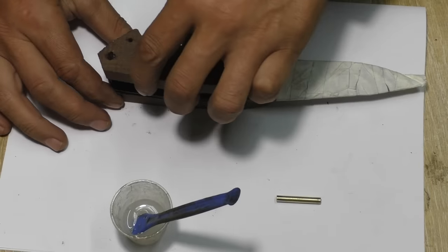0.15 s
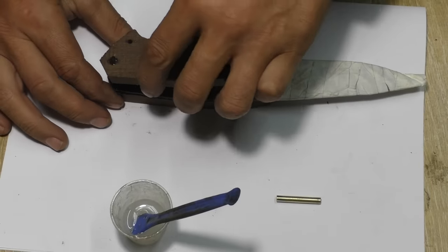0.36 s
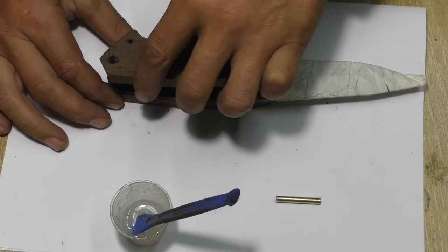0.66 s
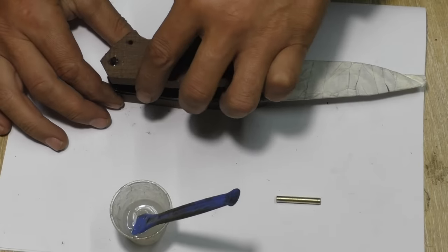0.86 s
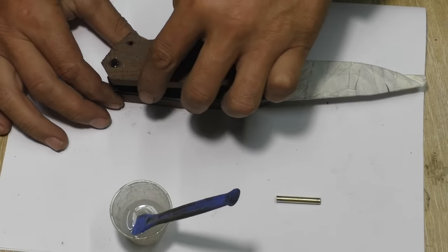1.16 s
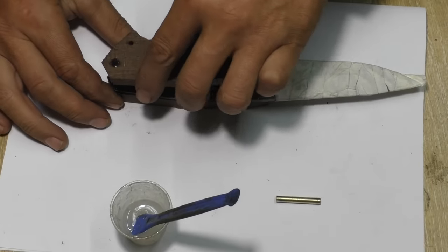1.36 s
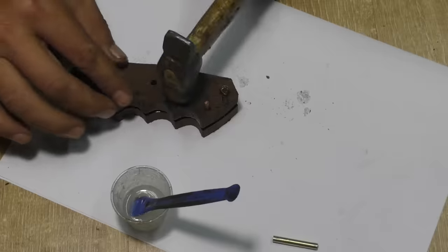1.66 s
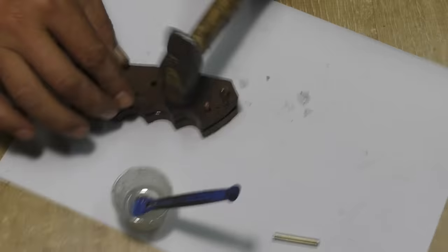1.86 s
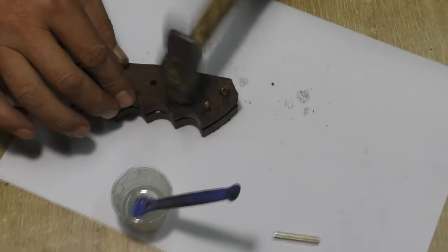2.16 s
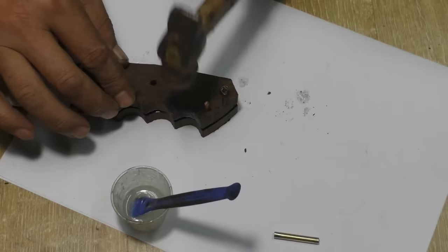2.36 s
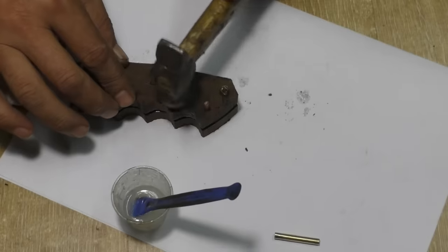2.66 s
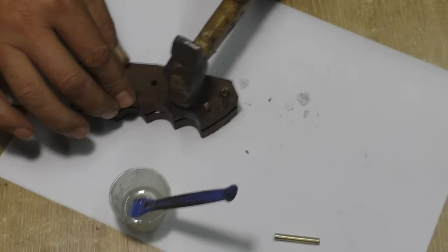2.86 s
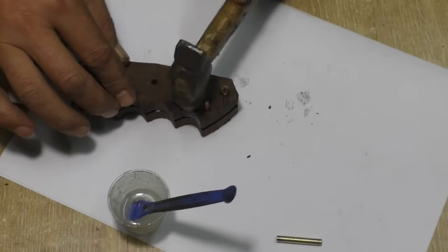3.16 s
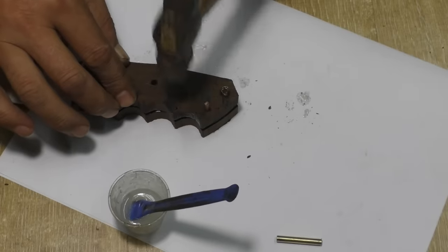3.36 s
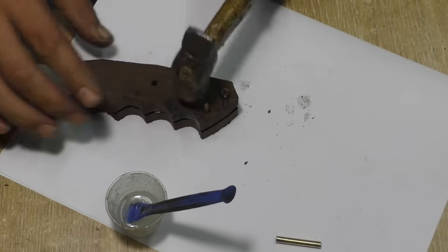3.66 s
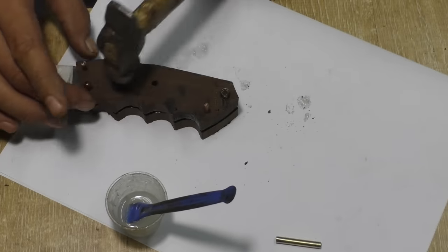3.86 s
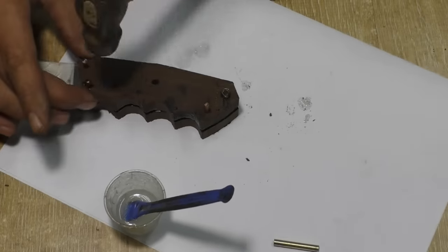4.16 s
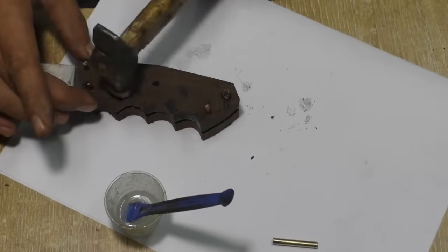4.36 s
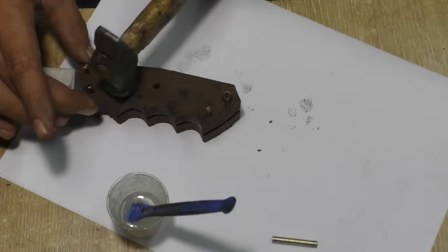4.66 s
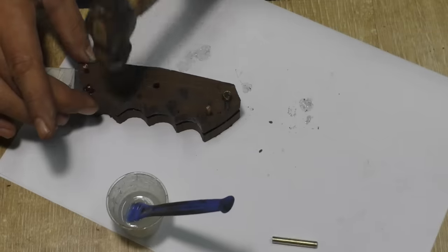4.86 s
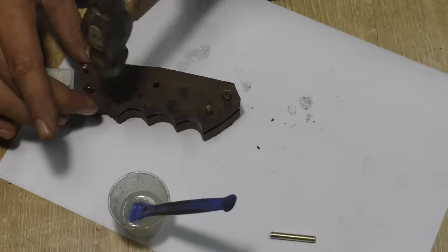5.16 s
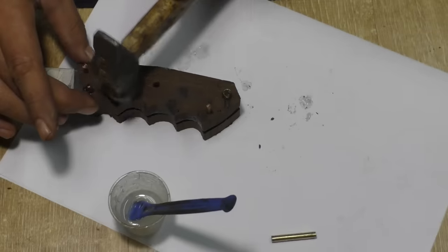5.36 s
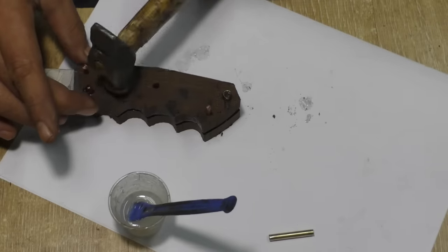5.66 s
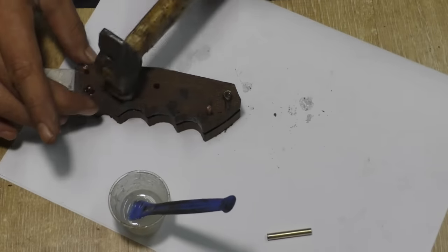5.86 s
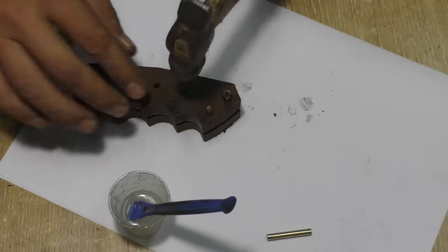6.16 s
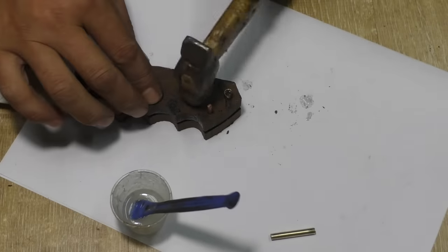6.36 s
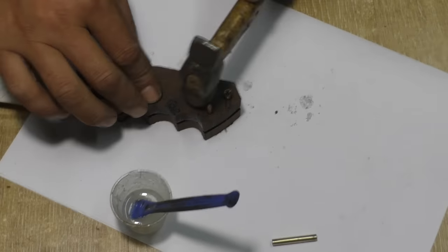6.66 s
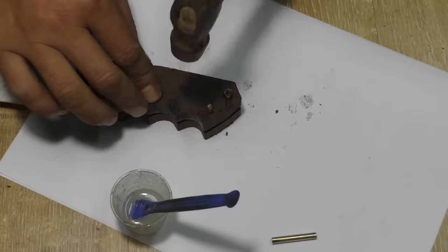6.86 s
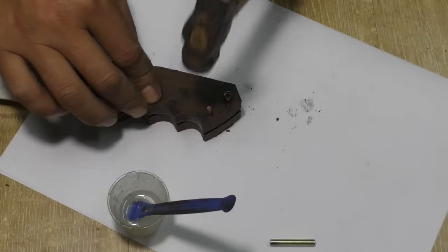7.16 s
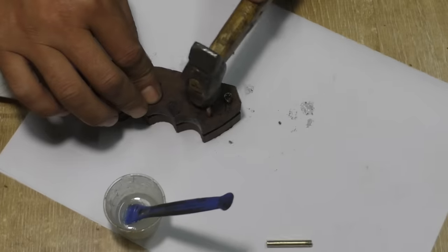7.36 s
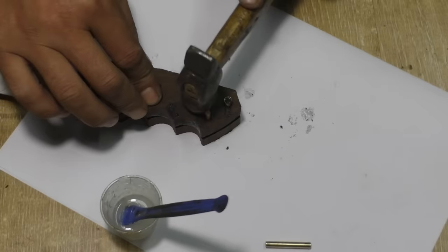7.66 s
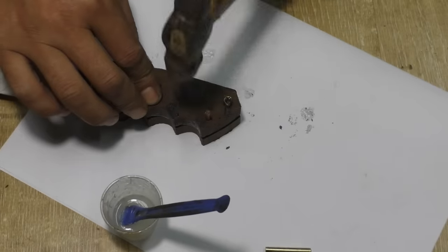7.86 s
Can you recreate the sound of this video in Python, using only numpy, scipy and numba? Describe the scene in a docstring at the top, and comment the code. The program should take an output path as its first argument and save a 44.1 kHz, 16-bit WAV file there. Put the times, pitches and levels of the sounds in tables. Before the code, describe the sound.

Faint ticks, a soft creaking slide and a little paper rustle come from fingers pressing pins into a knife handle. Then a small hammer drives the metal pins home in three runs, about three blows a second, each run opening with a lighter tap. Every blow is a sharp steel crack with a hard knock and a low boom from the wooden bench. It is heard close up in a small room with a low hum.

```python
"""Over low room tone, fingers press pins into a knife handle: ticks, a creaking slide, paper rustle.
From 1.6 s a small hammer taps the pins home in three runs, one pin a run, each opening with a light tap.
Each blow cracks, knocks the handle, booms in the wooden bench and rings off the walls of a small room.
The recorder's gain control ducks at each hard blow and lifts the tail as it lets go."""
import sys
import numpy as np
from scipy import signal
from scipy.fft import rfft, irfft, next_fast_len
from scipy.io import wavfile
from scipy.ndimage import uniform_filter1d, minimum_filter1d
from numba import njit

SR = 44100
rng = np.random.default_rng(int(sys.argv[2]) if len(sys.argv) > 2 else 0)


def waveform_to_disk(signal):
    """Save audio, clipped to [-1, 1], as 16-bit WAV at the path in sys.argv[1]."""
    frames = np.transpose(np.atleast_2d(signal))
    scaled = np.clip(frames, -1, 1) * 32767
    samples = np.round(scaled).astype(np.int16)
    wavfile.write(sys.argv[1], SR, samples)


N = 353682
TIME_S = np.arange(N) / SR

# hammer blows (time [s], force [dB], steel crack [dB], low knock [dB])
BLOWS = [(1.6105, 3, -8.5, 15), (1.8887, 20.5, 4, 6), (2.2158, 22, 1, 3), (2.544, 19, 4, 10),
         (2.8545, 22.5, 2.5, 4.5), (3.1584, 20, 4.5, 6), (3.438, 21.5, 4.5, 6.5), (3.9594, 4, -17.5, 11),
         (4.2697, 18.5, 3.5, 8), (4.632, 20, 6.5, 10.5), (4.9684, 17, 5, 10.5), (5.2606, 16, -0.5, 8),
         (5.5438, 15.5, 5, 8), (5.8270, 17, 1, 7.5), (6.371, -0.5, -14.5, 15), (6.6541, 19, 6.5, 8),
         (6.993, 19.5, 2.5, 7.5), (7.3374, 20.5, 0.5, 7), (7.6708, 0.5, -21.5, 5.5), (7.673, 17, 3, 8),
         (7.9726, 19.5, -1, 8.5)]
# pin of each run (start [s], hard core of the knock [dB], overload thump [dB], thud [dB])
PINS = [(1.5, 1.15, 1.4, -26), (3.8, 8, 1, -28), (6.2, 1.5, 1.5, -24)]
# modes (frequency [Hz], level [dB], t60 [s])
HANDLE_LOW_MODES = [(745, -33.5, 0.024), (1035, -15.5, 0.023), (1105, -10.5, 0.016), (1297, -20.5, 0.043),
                    (1706, -17, 0.02)]
HANDLE_HIGH_MODES = [(1876, -17.5, 0.033), (2034, -11, 0.037), (2216, 0, 0.0087), (2587, -2, 0.0087),
                     (2937, -8, 0.016), (3224, -5.5, 0.009), (3610, -9.5, 0.019), (4120, -4, 0.0083),
                     (4540, -15.5, 0.024)]
BENCH_MODES = [(34.8, -37, 0.082), (58.4, -39, 0.21), (108.97, -35, 0.3), (113.2, -33, 0.31),
               (150, -26, 0.17), (213.5, -31.5, 0.17), (260, -27, 0.14), (298, -30, 0.17),
               (327, -35.5, 0.28), (340.4, -44, 0.36), (366.3, -19.5, 0.16), (377.5, -40, 0.23),
               (393, -38, 0.34), (432, -39.5, 0.18), (495, -32, 0.018)]
HAMMER_HEAD_MODES = [(13050, -69.5, 0.26)]
# handle slapping the bench (frequency [Hz], level [dB], t60 [s])
THUD_MODES = [(148, -5, 0.013), (240, -1.5, .03), (425, 3, 0.02)]
# steel crack (frequency [Hz], level [dB])
CRACK_SPECTRUM = [(5000, -9.5), (6000, 8), (6900, 0), (8200, 8), (10800, 7.5), (13000, 7), (15500, -10)]
# wall reflections (frequency [Hz], level [dB], t60 [s], side re mid [dB])
WALL_RESPONSE = [(197.9, -42.5, 0.24, -26), (415, -37.5, 0.35, -15.5), (545, -47, 0.4, -11),
                 (860, -35.5, 0.24, -13.5), (926, -35, 0.32, -10.5), (1800, -29.5, 0.32, -9),
                 (2320, -25, 0.28, -10), (4030, -32, 0.29, -7), (5560, -37, 0.28, -12.5),
                 (10600, -45.5, 0.23, -16), (15000, -56.5, 0.14, -6.5)]
# fingers on paper and pins (time [s], snap [dB], scrape [dB], scrape pitch [Hz])
FINGER_TICKS = [(.1274, -54, -75, 3000), (.4094, -52, -75, 3000), (.431, -50, -75, 3000),
                (.5132, -39, -58, 4500), (0.574, -65, -44, 2500), (0.625, -62, -45, 3600),
                (.6553, -59, -75, 3000), (0.75, -55, -58, 3380), (.845, -56, -75, 3000),
                (1.0768, -42, -48.5, 3740), (1.126, -51, -59, 5000), (1.1704, -46, -72, 3000),
                (1.24, -48, -70, 3000), (1.721, -55, -70, 3000), (6.409, -55, -70, 2780),
                (6.4492, -56.5, -80, 3000), (6.483, -77, -65, 4800)]
# sliding handle (frequency [Hz], width [Hz], level [dB])
SLIDE_RESONANCES = [(401, 29, 6), (734, 46, 5.5), (940, 220, 5), (1180, 110, 2.5), (1590, 120, -27)]
# handle and paper movements (peak time [s], rise [s], fall [s], level [dB])
SLIDE_SWELLS = [(.41, 0.096, 0.22, -64), (.63, 0.016, 0.057, -66), (1.2, 0.1, 0.12, -62.5),
                (1.43, 0.12, .09, -68)]
RUSTLE_SWELLS = [(.52, 0.03, .03, -63), (.65, 0.14, 0.089, -58.5), (1.52, 0.17, .004, -60),
                 (3.955, 0.031, .005, -53.5), (6.296, 0.012, .019, -60.5), (6.366, 0.022, 0.006, -49)]
# room tone, and its side re mid (frequency [Hz], level [dB])
TONE_SPECTRUM = [(12, -59.5), (20, -27.5), (55, 1.5), (151, 2.5), (230, -2), (479, -9.5), (599, -24),
                 (1180, -16.5), (1320, -16.5), (2120, -22.5), (5070, -23), (15200, -20.5), (16500, -32)]
TONE_SIDE_SPECTRUM = [(60, -19.5), (110, -13.5), (200, -9.5), (380, -11.5), (700, -14), (1290, -10),
                      (2380, -7.5), (4400, -4), (8120, -12.5), (15000, 1.5)]
# room tone before, then during the hammering (bass [dB], middle [dB], treble [dB])
TONE_BAND_LEVELS = [(-57.5, -59, -66.5), (-53.5, -58, -78)]
# room tone gain, sinking between runs (time [s], gain [dB])
TONE_ENVELOPE = [(0, -0.5), (.5, 0.1), (1.1, 0.6), (1.52, 3.5), (1.56, 0), (3.5, 0.6), (3.75, -6),
                 (4.2, -2.5), (5.85, -2), (6.1, -10.5), (6.32, -7), (6.6, -4), (8.02, -6)]

CORE_HZ, CORE_WIDTH_OCT = 2670, 0.25
BURST_S = 0.05
SIDE_SIGNS = np.array([[1], [-1]])


def hammer(boom_per_knock=0.27, thump_per_crack=0.2, thud_right_db=8, side_db=-6.5, side_lag_s=0.0037):
    """Blows on the pins; returns mono direct sound, the click sent to the walls and a stereo part."""
    direct, click, wide = np.zeros(N), np.zeros(N), np.zeros((2, N))
    for time_s, force_db, crack_db, knock_db in BLOWS:
        _, core_db, overload_db, thud_db = [pin for pin in PINS if pin[0] < time_s][-1]
        force = undb(force_db)
        boom_db = -4.5 + boom_per_knock * knock_db
        thump_db = -13 + overload_db + thump_per_crack * crack_db + 2 * rng.standard_normal()
        contact = chatter()
        mid_ring, side_ring = handle_knock(crack_db, knock_db, core_db)
        mid_crack, side_crack = undb(crack_db) * steel_crack()
        add(direct, force * np.convolve(contact, mid_ring), time_s)
        add(direct, force * mid_crack, time_s)
        add(direct, force * undb(boom_db) * bench_boom(), time_s)
        head = ring(HAMMER_HEAD_MODES, 0.3, detune=0, scatter_db=2)
        add(direct, force * undb(crack_db) * head, time_s)
        add(click, force * diffuse_click(crack_db, knock_db, core_db), time_s)
        # stereo spread of knock and crack, starting slightly late
        add(side_ring, side_crack, 0)
        side = force * undb(side_db) * side_ring[int(side_lag_s * SR):]
        thud = force * undb(thud_db + boom_db) * ring(THUD_MODES, 0.06, detune=0.05, scatter_db=2.5)
        for channel, sign in zip(wide, (1, -1)):
            add(channel, undb(-sign * thud_right_db / 2) * thud, time_s)
            add(channel, sign * side, time_s + side_lag_s)
            add(channel, force * undb(thump_db) * overload_thump(), time_s + 0.002)
    return direct, click, wide


def chatter(rattle_db=-11, t60_s=0.012, length_s=0.01):
    """Contact force: an impulse, then the hammer rattles on the pin."""
    contact = rng.standard_normal(int(length_s * SR)) * fade(t60_s, length_s)
    contact *= undb(rattle_db) / np.sqrt(np.sum(contact ** 2))
    contact[0] = 1
    return contact


def handle_knock(crack_db, knock_db, core_db, rise_s=0.00038):
    """The handle rings, drawn twice for mid and side; a soft contact leaves the high modes quiet."""
    high_modes = []
    for hz, db, t60_s in HANDLE_HIGH_MODES:
        tilt_db = 0.37 * crack_db * np.log2(hz / 1500)
        bump_db = core_db * np.exp(-(np.log2(hz / CORE_HZ) / CORE_WIDTH_OCT) ** 2)
        high_modes.append((hz, db + tilt_db + bump_db, t60_s))
    rings = []
    for _ in range(2):
        high = ring(high_modes, 0.08, detune=0.025, scatter_db=1.8)
        low = ring(HANDLE_LOW_MODES, 0.08, detune=0.03, scatter_db=1.8, sign=-1)
        rings.append(high + undb(knock_db) * low)
    return soft_onset(rings[0], rise_s, order=2), rings[1]


def steel_crack(gain_db=-17, t60_s=0.018):
    """Steel hits the pin: two bursts of treble noise, mid and side."""
    noise = rng.standard_normal((2, int(BURST_S * SR)))
    treble = colour(noise, CRACK_SPECTRUM, lo_hz=CRACK_SPECTRUM[0][0])
    return undb(gain_db) * burst(treble, t60_s)


def bench_boom(rise_s=0.0019):
    """Low modes of the bench top, slower to swing than the handle."""
    return soft_onset(ring(BENCH_MODES, 0.4, detune=0.001, scatter_db=0.23), rise_s)


def overload_thump(hz=135, width_hz=216, t60_s=0.042):
    """Low thump of the microphones overloading on hard blows, different in each channel."""
    noise = rng.standard_normal(int(BURST_S * SR))
    return burst(band(band(noise, hz, width_hz), hz, width_hz), t60_s)


def diffuse_click(crack_db, knock_db, core_db):
    """Heard from all sides the modes blur to a click: bassy with the knock, bright with the crack."""
    spectrum = [(1300, knock_db), (2200, 0.14 * crack_db),
                (CORE_HZ, 0.25 * crack_db + 0.43 * core_db), (6000, 0.7 * crack_db)]
    return colour(signal.unit_impulse(512, 64), spectrum)


def walls(click, gap_s=0.00083, early_db=11.5, early_t60_s=0.12):
    """Dense reflections in sixth-octave bands; nearby surfaces answer first, above the even decay."""
    hz, *columns = np.transpose(WALL_RESPONSE)
    noise, response = rng.standard_normal((2, SR // 2)), 0
    for lo_hz in 120 * 2 ** np.arange(0, 7.2, 1 / 6):
        level_db, t60_s, side_db = (np.interp(np.log(lo_hz), np.log(hz), column) for column in columns)
        mid, side = colour(noise, [(1, 0)], lo_hz, lo_hz * 2 ** (1 / 6))
        response += undb(level_db) * fade(t60_s, 0.5) * (mid + undb(side_db) * side * SIDE_SIGNS)
    response *= 1 + undb(early_db) * fade(early_t60_s, 0.5)
    response = np.pad(response, ((0, 0), (int(gap_s * SR), 0)))
    return signal.fftconvolve(click[None], response, axes=1)[:, :N]


def finger_ticks(snap_hz=11100, scrape_q=3.2):
    """Fingers catch on paper and pins: a bright snap and a duller scrape."""
    ticks = np.zeros(N)
    for time_s, snap_db, scrape_db, hz in FINGER_TICKS:
        snap, scrape = rng.standard_normal((2, int(BURST_S * SR)))
        snap = burst(band(snap, snap_hz, width_hz=3100), t60_s=0.0094)
        scrape = burst(band(band(scrape, hz, hz / scrape_q), hz, 2 * hz / scrape_q), t60_s=0.075)
        add(ticks, undb(snap_db) * snap + undb(scrape_db) * soft_onset(scrape, rise_s=0.0013), time_s)
    return ticks


def handle_slide():
    """The handle creaks over the bench: friction noise through narrow resonances."""
    friction = rng.standard_normal(N)
    creak = sum(undb(db) * unit_rms(band(friction, hz, width_hz))
                for hz, width_hz, db in SLIDE_RESONANCES)
    return swells(SLIDE_SWELLS) * creak


def paper_rustle(grain_samples=64, scatter_db=3):
    """Paper shifts under the hand: bright, grainy noise."""
    noise = rng.standard_normal(N)
    grain_db = scatter_db * np.repeat(rng.standard_normal(N // grain_samples + 1), grain_samples)[:N]
    return swells(RUSTLE_SWELLS) * unit_rms(band(noise * undb(grain_db), hz=9300, width_hz=9800))


def room_tone(hammer_from_s=1.527):
    """Rumble, house hum and hiss: shaped noise, wider in the treble."""
    mid, side = colour(rng.standard_normal((2, N)), TONE_SPECTRUM)
    stereo = mid + colour(side, TONE_SIDE_SPECTRUM) * SIDE_SIGNS
    bass = [(480, 0), (900, -24)]
    middle = [(400, -24), (750, 0), (3000, 0), (6500, -30)]
    treble = [(2500, -30), (5000, 0)]
    tone = 0
    for before_db, during_db, shape in zip(*TONE_BAND_LEVELS, (bass, middle, treble)):
        level_db = np.where(TIME_S < hammer_from_s, before_db, during_db)
        tone += undb(level_db) * unit_rms(colour(stereo, shape))
    return undb(np.interp(TIME_S, *np.transpose(TONE_ENVELOPE))) * tone


def ring(modes, length_s, detune, scatter_db, sign=1):
    """Decaying modes, varied per blow; sign -1 starts neighbours in opposition."""
    time_s, total = TIME_S[:int(length_s * SR)], 0
    for k, (hz, db, t60_s) in enumerate(modes):
        pitch_draw, level_draw = rng.standard_normal(2)
        wave = np.sin(2 * np.pi * hz * (1 + detune * pitch_draw) * time_s)
        total += sign ** k * undb(db + scatter_db * level_draw) * fade(t60_s, length_s) * wave
    return total


def swells(rows, depth_db=19):
    """Gain of rounded swells, depth_db down at one rise or fall time from the peak."""
    gain = 0
    for peak_s, rise_s, fall_s, db in rows:
        distance = (TIME_S - peak_s) / np.where(TIME_S < peak_s, rise_s, fall_s)
        gain += undb(np.maximum(db - depth_db * distance ** 2, -200))
    return gain


def colour(x, points, lo_hz=0, hi_hz=1e5):
    """Filter by (frequency [Hz], gain [dB]) points, keeping one band."""
    size = next_fast_len(x.shape[-1])
    hz = np.arange(size // 2 + 1) * SR / size + 1e-3
    point_hz, point_db = np.transpose(points)
    gain = undb(np.interp(np.log(hz), np.log(point_hz), point_db)) * (hz >= lo_hz) * (hz < hi_hz)
    return irfft(rfft(x, size) * gain, size)[..., :x.shape[-1]]


def band(x, hz, width_hz):
    """One resonance."""
    return signal.lfilter(*signal.iirpeak(hz, hz / width_hz, SR), x)


def burst(noise, t60_s):
    """Normalise noise and let it decay."""
    return unit_rms(noise) * fade(t60_s, BURST_S)


def fade(t60_s, length_s):
    """Exponential decay."""
    return np.exp(-np.log(1000) * TIME_S[:int(length_s * SR)] / t60_s)


def soft_onset(x, rise_s, order=1):
    """Exponential fade-in."""
    return x * (1 - np.exp(-TIME_S[:len(x)] / rise_s)) ** order


def undb(db):
    return 10 ** (np.asarray(db) / 20)


def unit_rms(x):
    return x / np.sqrt(np.mean(x ** 2))


def add(track, x, time_s):
    start = int(time_s * SR)
    track[start:start + len(x)] += x[:len(track) - start]


def scene():
    direct, click, wide = hammer()
    return direct + wide + walls(click) + finger_ticks() + handle_slide() + paper_rustle() + room_tone()


@njit
def release(cut_db, step_db):
    """The cut follows a rise at once and shrinks at a steady dB rate."""
    held_db, level_db = np.empty(len(cut_db)), 0.
    for i in range(len(cut_db)):
        level_db = max(level_db - step_db, cut_db[i])
        held_db[i] = level_db
    return held_db


def record(dry, threshold_db=-11, ratio=3.03, release_db_per_s=129.5, ahead_s=0.0021, lag_s=0.0023):
    """Look-ahead gain control, soft ceiling, steep top cut."""
    ceiling, top_hz = 0.84, 16500
    ahead = int(ahead_s * SR)
    peak = -minimum_filter1d(-np.abs(dry).max(axis=0), 2 * ahead + 1)
    over_db = np.maximum(20 * np.log10(peak + 1e-9) - threshold_db, 0)
    cut_db = uniform_filter1d(release(over_db * (1 - 1 / ratio), release_db_per_s / SR), ahead)
    # the cut lags, so a blow's first swings hit the ceiling
    gain = undb(-np.roll(cut_db, int(lag_s * SR)))
    clipped = ceiling * np.tanh(1.03 * dry * gain)
    return signal.sosfilt(signal.ellip(8, 0.2, 70, top_hz, fs=SR, output="sos"), clipped)


dry = scene()
out = record(dry)
waveform_to_disk(out)
```